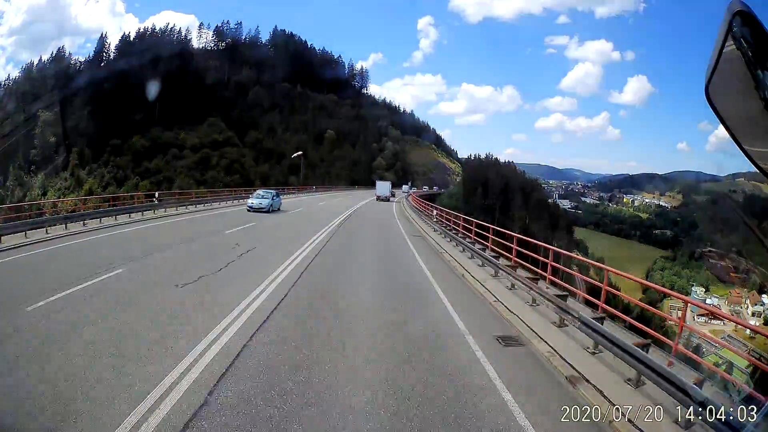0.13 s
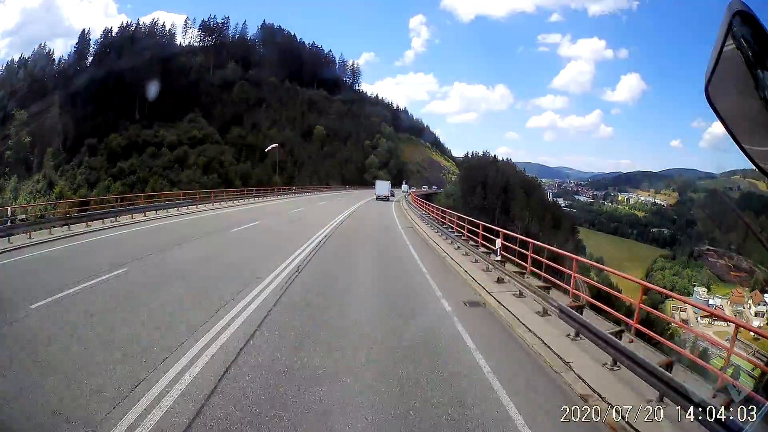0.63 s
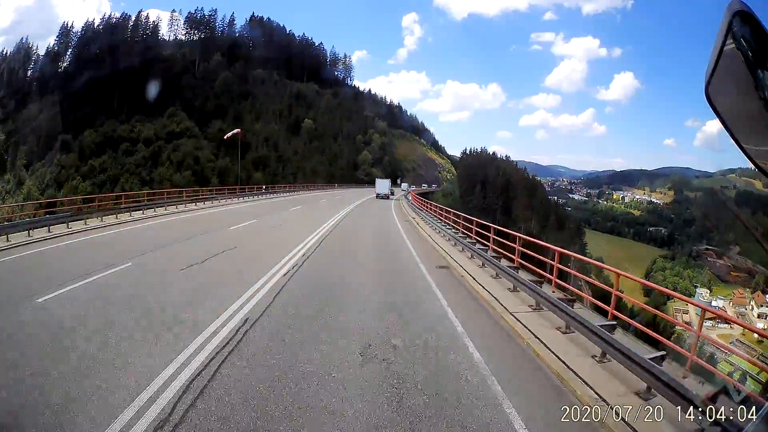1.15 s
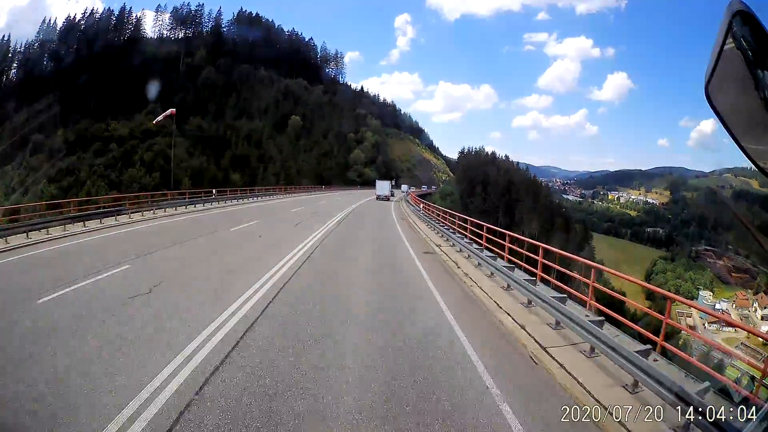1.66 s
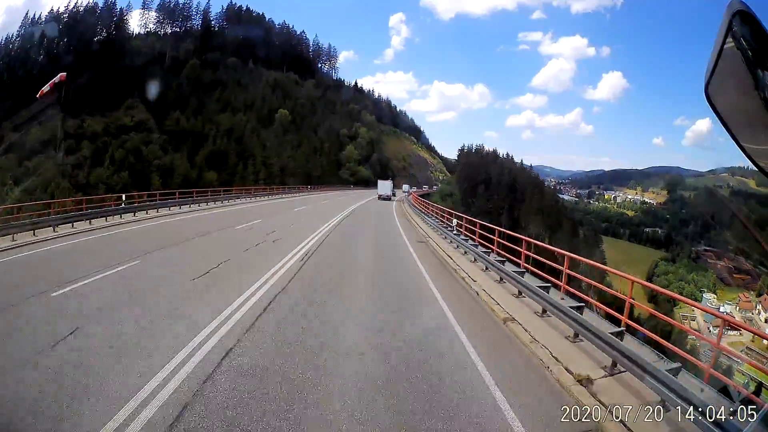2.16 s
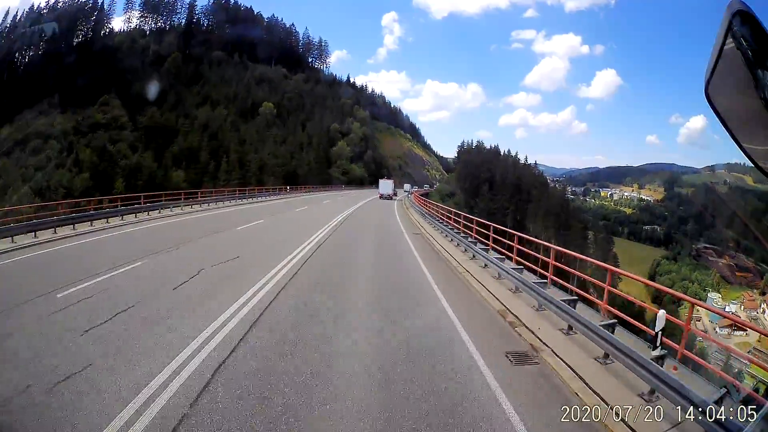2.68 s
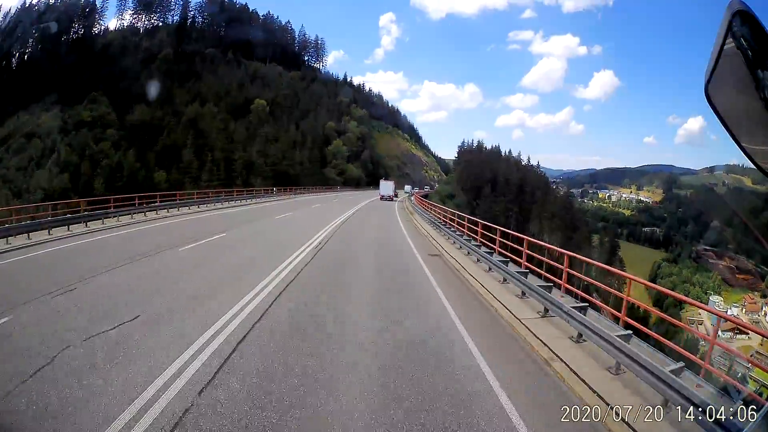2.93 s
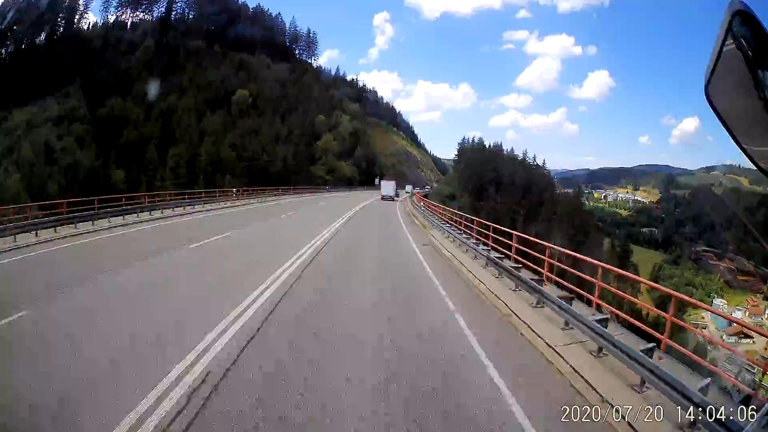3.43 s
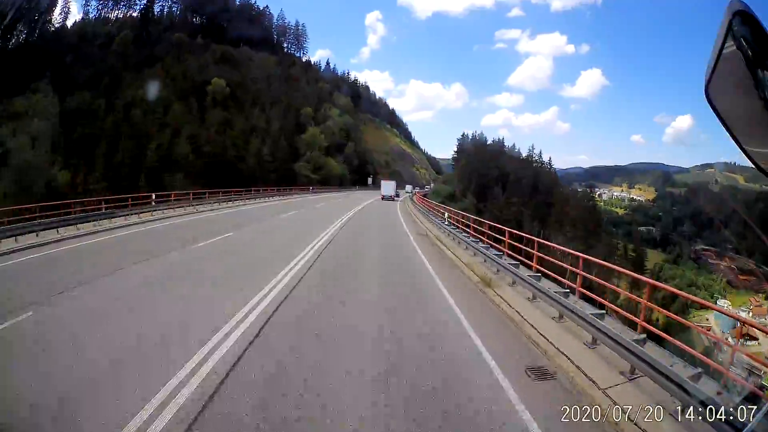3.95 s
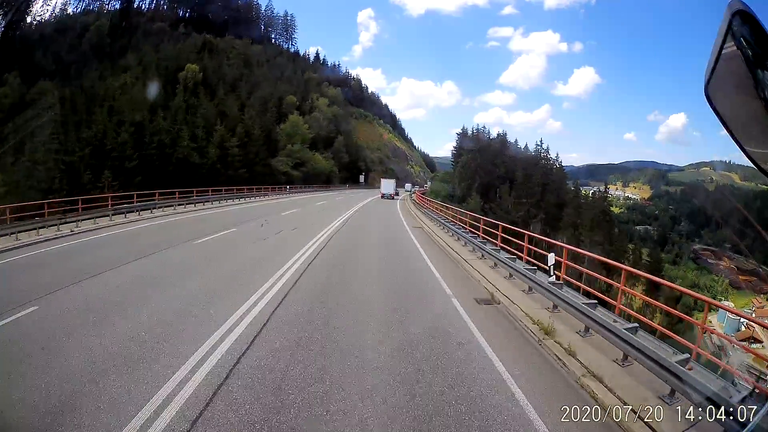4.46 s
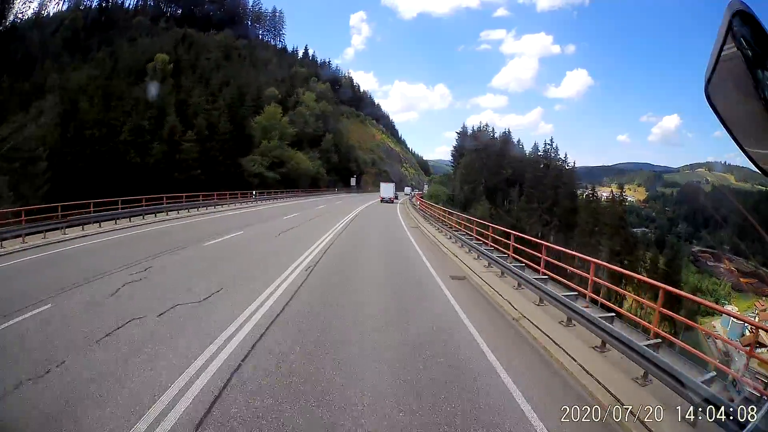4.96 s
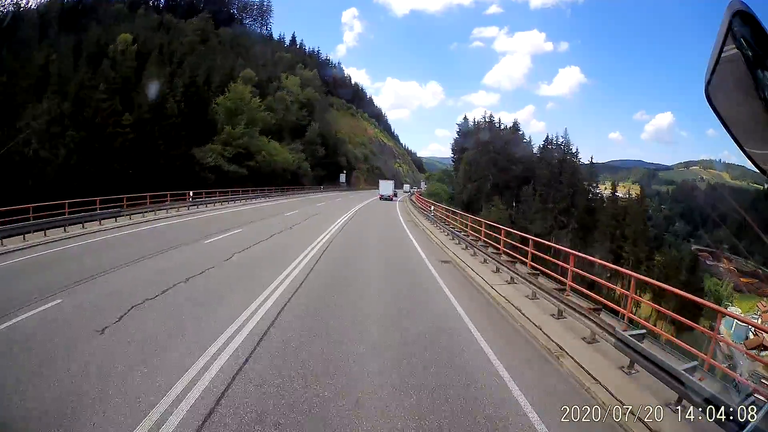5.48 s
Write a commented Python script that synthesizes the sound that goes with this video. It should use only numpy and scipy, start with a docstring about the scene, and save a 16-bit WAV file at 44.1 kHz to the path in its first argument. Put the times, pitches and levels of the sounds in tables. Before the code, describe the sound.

A constant engine drone and muffled tyre roar fill a moving truck cab, with faint ticking trim and one short rattle after a bump.

```python
"""Steady diesel hum in road and wind roar, inside a truck cab at even speed on a bridge road.
Six-cylinder engine: a comb of sines at orders of the working cycle. Roar: coloured noise.
Bumps swell two very low cab modes. Loose trim, as struck modes plus noise puffs, ticks now and
then and clatters once after the largest bump."""
import sys
import numpy as np
from scipy import signal
from scipy.fft import rfft, irfft, next_fast_len
from scipy.io import wavfile
from scipy.ndimage import uniform_filter1d

SR = 44100
rng = np.random.default_rng(int(sys.argv[2]) if len(sys.argv) > 2 else 0)


def natural_amplitude(level_db):
    """Convert a level in decibels to a linear amplitude factor, elementwise."""
    exponent = np.asarray(level_db, float) / 20
    return 10 ** exponent


def put_to_file(sound):
    """Save the sound as 16-bit audio at rate SR, in the file named by the first command-line argument."""
    columns = np.atleast_2d(sound).T  # one column per channel
    safe = np.clip(columns, -1, 1)
    whole_steps = np.round(safe * 32767)
    wavfile.write(sys.argv[1], SR, whole_steps.astype(np.int16))


N = 246959

# tyre and wind roar through the cab walls, mean spectrum: f/Hz, level/(dB per Hz)
ROAR_SPECTRUM = [(29, -47.5), (42, -61), (70, -52.5), (185, -55.5), (205, -60), (300, -59.5), (400, -64.5),
                 (630, -64), (770, -63.5), (800, -67), (1300, -71), (1760, -75), (2100, -81), (5200, -95),
                 (7400, -98.5)]
# cab hollows that lift or swallow the roar: f/Hz, width/Hz, gain/dB
CAB_HOLLOWS = [(68, 14, 3), (85, 14, -3), (140, 20, -2), (175, 20, 2), (270, 25, -2), (650, 25, -3),
               (690, 60, 1), (970, 60, -4), (1015, 30, 3), (1070, 40, -3), (1430, 120, -3), (1880, 100, -3),
               (2280, 70, 3)]
# bass roar over rougher and smoother tarmac, only the deviation from the mean counts: t/s, level/dB
RUMBLE_LEVEL = [(0, -32.5), (.55, -34.5), (1.0, -31), (1.35, -29.5), (1.9, -31), (2.6, -31.5), (3.0, -31),
                (3.2, -36.5), (3.55, -31.5), (3.8, -31), (4.0, -29), (4.4, -32), (4.55, -37), (4.8, -29.5),
                (4.97, -38), (5.2, -32), (5.6, -29.5)]
# road bumps: t/s, pitching level/dB, bounce level/dB
ROAD_BUMPS = [(.53, -45, -47.5), (1.1, -42, -42.5), (1.31, -31, -35), (1.48, -32, -39.5),
              (1.8, -33.5, -37.5), (2.1, -34.5, -43.5), (2.26, -39, -36), (3.29, -40, -45),
              (3.63, -44, -39.5), (3.95, -26.5, -27.5), (4.1, -31, -44.5), (4.25, -33, -51),
              (4.5, -46, -37.5), (4.68, -33, -44.5), (5.1, -31, -45), (5.42, -39, -45)]
# mean frequencies of cab bounce, cab pitching: f/Hz
CAB_MODES_HZ = (10.5, 23.5)
# loose trim knocks: t/s, ring peak/dB, brightness/Hz, scratch T60/s
TRIM_KNOCKS = [(1.574, -45, 5600, .09), (1.7769, -44.5, 5800, .1), (1.9719, -45.5, 6000, .1),
               (2.58, -45, 6500, .12), (2.884, -45.5, 5500, .08), (3.1862, -46, 5800, .08),
               (3.3907, -47, 5800, .1), (3.941, -46, 5200, .03), (4.0854, -47, 7000, .04),
               (4.0991, -43, 3500, .05), (4.105, -40, 3000, .04), (4.1138, -36, 3700, .016),
               (4.117, -47, 7000, .03), (4.146, -33.5, 5000, .03), (4.1505, -39.5, 4100, .088),
               (4.1583, -42, 3000, .088), (4.237, -49, 4000, .05), (4.3874, -46, 6400, .05),
               (4.607, -46, 5500, .07)]
# trim modes; the scratch T60 caps their own: f/Hz, level/dB, T60/s
TRIM_MODES = [(2820, -1, .015), (3580, 0, .014), (4190, 0, .02), (4700, -5, .012), (5520, -3, .018),
              (6300, -4, .012), (6870, -2, .015), (7400, -1, .018), (8100, 3, .012)]
# engine speed, sinking slowly overall: t/s, working cycles per s
ENGINE_SPEED = [(0, 16.025), (1.1, 15.978), (1.4, 15.99), (2.8, 15.94), (4.2, 15.875), (4.8, 15.885),
                (5.6, 15.78)]
# comb of all orders before scatter: order, level/dB rms
ORDER_COMB = [(1, -58), (20, -58), (30, -62), (60, -65), (90, -68), (105, -66), (110, -63), (120, -74)]
# orders that stand out, 6 = firing, 52 and 108 = gear teeth: order, level/dB rms before load and waver
STRONG_ORDERS = [(2, -48), (4, -48), (6, -40), (7, -45), (8, -45), (11, -49), (13, -50), (15, -47),
                 (16, -49), (17, -51), (19, -51), (25, -54), (30, -53), (52, -50), (108, -51), (109, -60),
                 (111, -62)]
# whines of geared shafts, between whole orders: order, level/dB rms before load and waver
SHAFT_ORDERS = [(18.38, -45), (47.5, -54), (48.33, -59), (142.67, -72)]
# gear load on two whines: t/s, gain of order 18.38/dB, gain of order 108/dB
GEAR_LOAD = [(0, 2, 3), (.6, 3, 3), (1.3, 0, 3), (2.3, 2, 3), (2.8, -3, 2), (3.5, 1, -1), (4.2, -1, 0),
             (4.7, -4, -2), (5.3, 1, -2)]
# small microphone treble roll-off: f/Hz, gain/dB
MIC_ROLLOFF = [(7400, -0.5), (7800, -5.5), (8000, -10.5), (8200, -10.5), (8700, -23), (9000, -36),
               (9300, -74.5)]


def read(points, hz):
    """Table lookup on a log-frequency axis."""
    f, value = np.transpose(points)
    return np.interp(np.log(hz + 1), np.log(f + 1), value)


def wander(top_hz, count=1):
    """Slow random curves of rms 1: sums of sines up to top_hz."""
    t = np.arange(0, N + 256, 256) / SR
    f = np.geomspace(top_hz / 12, top_hz, num=16)
    angle = 2 * np.pi * (f * t[:, None, None] + rng.random((count, 16)))
    curves = (np.sin(angle) / np.sqrt(f)).sum(-1).T
    return [np.interp(np.arange(N) / SR, t, c / c.std()) for c in curves]


def jolts(t):
    """Pitching and bounce levels in dB: steady tremor power plus one Gaussian swell per bump."""
    bump_s, *peaks_db = np.transpose(ROAD_BUMPS)[:, :, None]
    levels_db = []
    # pitching, then bounce: lag behind the bump/s, spread/s, tremor/dB
    for peak_db, (lag_s, spread_s, calm_db) in zip(peaks_db, [(0, .07, -44), (.11, .08, -45)]):
        swells = natural_amplitude(2 * peak_db) * np.exp(-((t - bump_s - lag_s) / spread_s) ** 2)
        levels_db.append(10 * np.log10(natural_amplitude(2 * calm_db) + swells.sum(0)))
    return levels_db


def roar(patchy_db=0.74, flicker_db=1., low_hz=260., high_hz=2500., hiss_db_per_bounce_db=0.12):
    """Coloured noise: bass follows the rumble, treble the bounce; patchy, with treble flicker."""
    stft_size = dict(nperseg=2048, noverlap=1536)
    hz, t, noise = signal.stft(rng.standard_normal(N), SR, **stft_size)
    colour_db = read(ROAR_SPECTRUM, hz)
    for f, width, db in CAB_HOLLOWS:
        colour_db = colour_db + db / (1 + (2 * (hz - f) / width) ** 2)
    colour_db -= 40 * np.clip(1 - hz / 26, 0, 1)  # leaves the lowest bass to the shaking

    patches = rng.standard_normal(noise.shape)
    patches = uniform_filter1d(patches, size=20, axis=0)
    patches = uniform_filter1d(patches, size=6, axis=1)
    field_db = colour_db[:, None] + patchy_db * patches / patches.std()

    low = 1 / (1 + (hz / low_hz) ** 4)
    high = 1 / (1 + (high_hz / (hz + 1)) ** 4)
    rumble_s, rumble_db = np.transpose(RUMBLE_LEVEL)
    field_db += np.outer(low, np.interp(t, rumble_s, rumble_db - rumble_db.mean()))
    bounce_db = jolts(t)[1]
    hiss_db = hiss_db_per_bounce_db * (bounce_db - bounce_db.mean())
    field_db += np.outer(high, hiss_db + flicker_db * rng.standard_normal(len(t)))
    sound = signal.istft(noise * natural_amplitude(field_db), SR, **stft_size)[1][:N]
    return np.sqrt(SR / 2) * sound  # density per Hz to amplitude


def shake(drift=0.1, waver_db=1.0):
    """Cab bouncing and pitching on its springs: two low tones of drifting pitch and level."""
    t, out = np.arange(0, N + 256, 256) / SR, np.zeros(N)
    pitching_db, bounce_db = jolts(t)
    sways, wavers = wander(5.2, count=2), wander(11.0, count=2)
    for hz, db, sway, waver in zip(CAB_MODES_HZ, (bounce_db, pitching_db), sways, wavers):
        level = natural_amplitude(np.interp(np.arange(N) / SR, t, db) + waver_db * waver)
        turns = np.cumsum(hz * (1 + drift * sway)) / SR
        out += level * np.sqrt(2) * np.sin(2 * np.pi * turns)
    return out


def knocks(count=160, faint_db=-49, faint_t60_s=.07, bounce_half_db=-37):
    """Listed knocks plus faint chance ones, likelier as the bounce nears and passes bounce_half_db."""
    when, size, tone, luck = rng.random((count, 4)).T
    s = when * N / SR
    heard = luck < 1 / (1 + natural_amplitude(2 * (bounce_half_db - jolts(s)[1])))
    peak_db = faint_db - 6 * size
    bright_hz = 3500 + 3500 * tone
    rows = zip(s[heard], peak_db[heard], bright_hz[heard])
    return TRIM_KNOCKS + [(a, b, c, faint_t60_s) for a, b, c in rows]


def trim(octaves=.55, puff_db=-.5, attack_s=.0003):
    """Each knock strikes the modes near its brightness, then scratches on as a dying noise puff."""
    size = 4000
    t, out = np.arange(size) / SR, np.zeros(N + size)
    for s, db, bright_hz, scratch_t60_s in knocks():
        ring = np.zeros(size)
        for hz, mode_db, t60_s in TRIM_MODES:
            decay = natural_amplitude(mode_db - 60 * t / min(t60_s, scratch_t60_s))
            nearness = np.exp(-.5 * (np.log2(hz / bright_hz) / octaves) ** 2)
            ring += decay * nearness * np.cos(2 * np.pi * hz * t)
        ring *= np.minimum(t / attack_s, 1)
        band_hz = [.55 * bright_hz, min(1.5 * bright_hz, 9500)]
        band = signal.butter(2, band_hz, "band", fs=SR, output="sos")
        scratch = signal.sosfilt(band, rng.standard_normal(size))
        puff = scratch * natural_amplitude(puff_db - 60 * t / scratch_t60_s)
        out[round(s * SR):][:size] += natural_amplitude(db) * (ring / abs(ring).max() + puff)
    return out[:N]


def engine(waver_db=1.5, waver_hz=8., slip_turns=.03, flutter=.0012, scatter_db=6., step=6):
    """One sine per order; uneven cycles flutter the speed and waver each order's level and phase."""
    t = np.arange(0, N, step) / SR  # all orders are low, a coarse grid carries them
    speed = np.interp(t, *np.transpose(ENGINE_SPEED))
    speed = speed * (1 + flutter * wander(waver_hz)[0][::step])
    cycles = np.cumsum(speed) * step / SR

    orders = np.arange(1, ORDER_COMB[-1][0] + 1)
    comb_db = np.interp(orders, *np.transpose(ORDER_COMB))
    comb_db += scatter_db * rng.uniform(-1.1, 1, len(orders))
    lines = dict(zip(orders, comb_db))
    lines.update(STRONG_ORDERS + SHAFT_ORDERS)

    # 12 levels and 11 phases are shared out, so few orders waver alike
    level = natural_amplitude(waver_db * np.array(wander(waver_hz, count=12))[:, ::step])
    phase = slip_turns * np.array(wander(waver_hz, count=11))[:, ::step]
    load_s, *load_db = np.transpose(GEAR_LOAD)
    load = {order: natural_amplitude(np.interp(t, load_s, db)) for order, db in zip((18.38, 108), load_db)}
    start, out = rng.random(len(lines)), np.zeros(len(t))
    for k, (order, db) in enumerate(lines.items()):
        angle = 2 * np.pi * (order * cycles + start[k] + phase[k % 11])
        peak = natural_amplitude(db) * np.sqrt(2) * load.get(order, 1)
        out += peak * level[k % 12] * np.sin(angle)
    return signal.resample_poly(out, step, 1, window=("kaiser", 10))[:N]


def scene():
    """Sum of all sources at the microphone behind the windscreen, one channel."""
    return (roar() + shake() + trim() + engine())[None]


def top_cut(x):
    """Nothing passes above the cut-off."""
    return signal.sosfilt(signal.butter(12, 9020, fs=SR, output="sos"), x)


def record(dry):
    """Slow camera sampling mirrors the top treble about half its rate; the microphone rolls it off."""
    camera_rate_hz = 16000
    size = next_fast_len(N)
    hz = np.fft.rfftfreq(size, 1 / SR)
    limited = irfft(rfft(dry, size) * (hz < camera_rate_hz / 2), size)
    mirror = 1 + 2 * np.cos(2 * np.pi * camera_rate_hz * np.arange(size) / SR)
    mirrored = limited * mirror
    gain = natural_amplitude(read(MIC_ROLLOFF, hz)) * (hz < MIC_ROLLOFF[-1][0])
    mix = irfft(rfft(mirrored) * gain, size)[:, :N]
    return top_cut(mix)


dry = scene()
out = record(dry)
put_to_file(out)
```